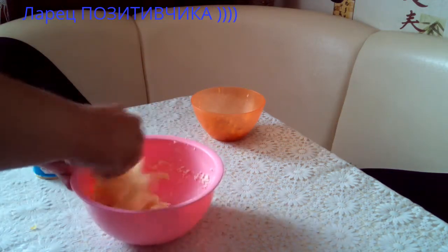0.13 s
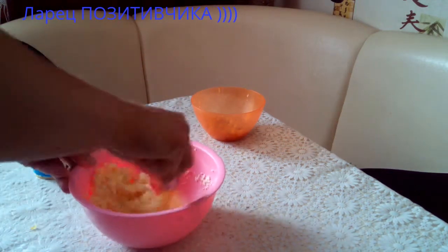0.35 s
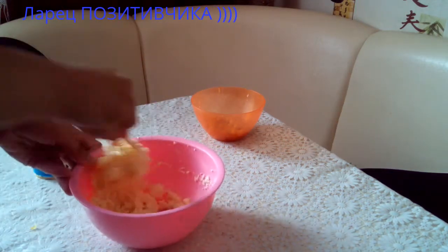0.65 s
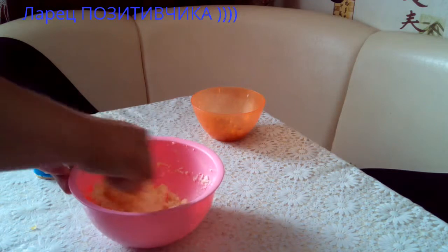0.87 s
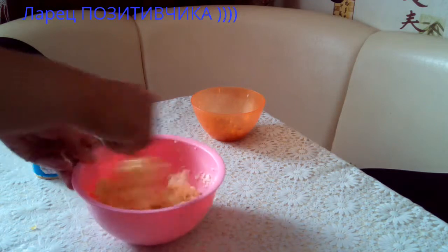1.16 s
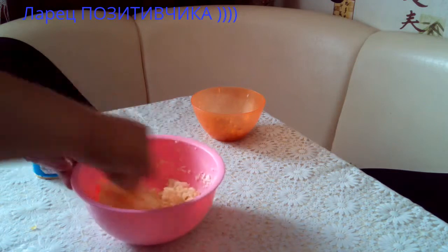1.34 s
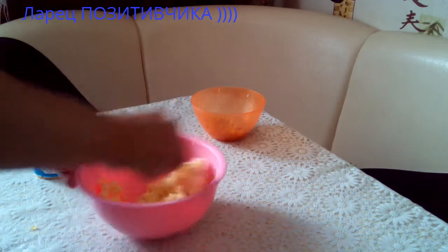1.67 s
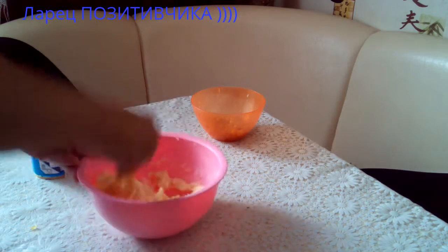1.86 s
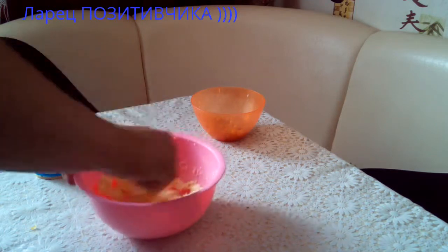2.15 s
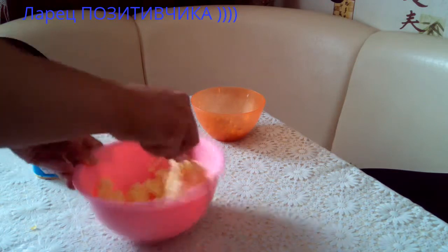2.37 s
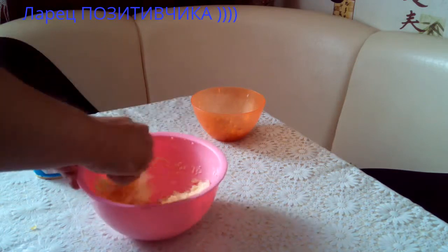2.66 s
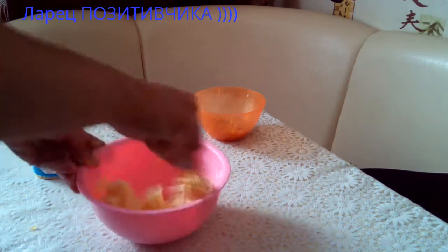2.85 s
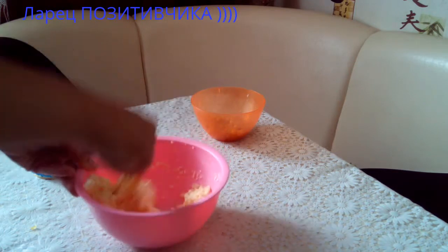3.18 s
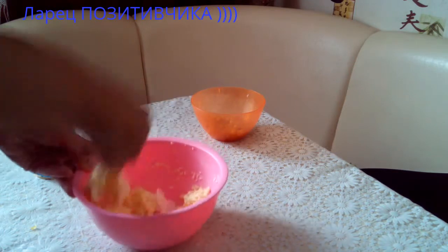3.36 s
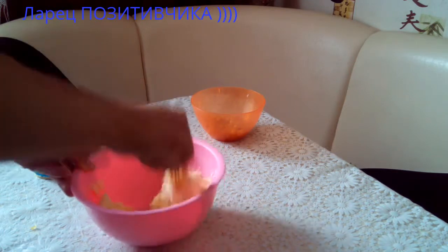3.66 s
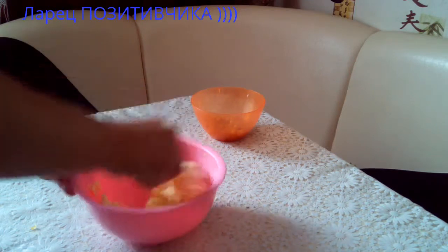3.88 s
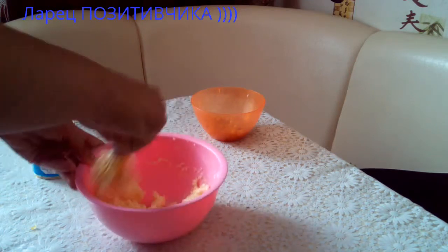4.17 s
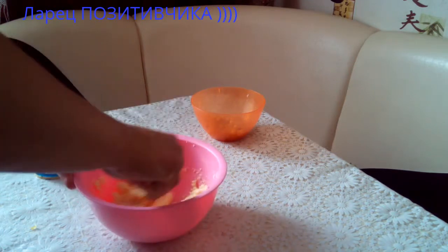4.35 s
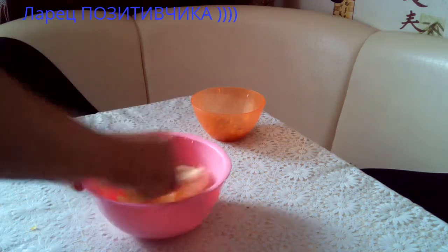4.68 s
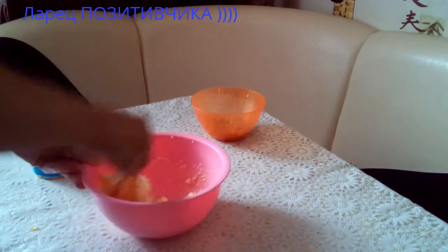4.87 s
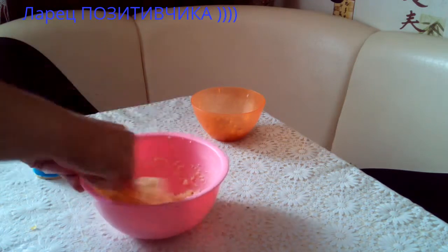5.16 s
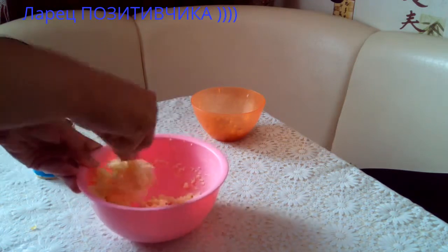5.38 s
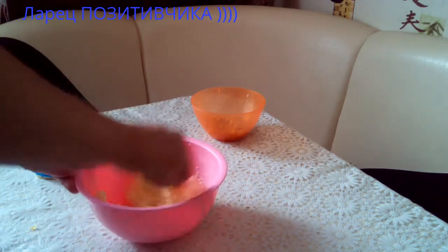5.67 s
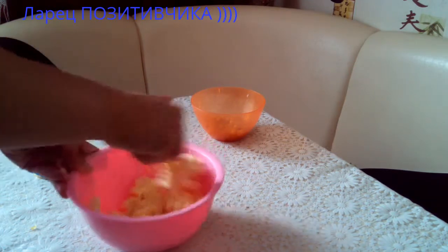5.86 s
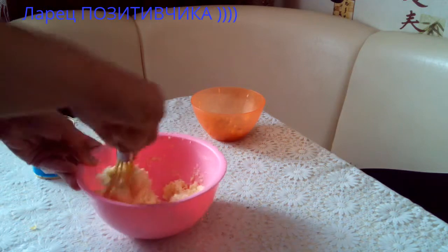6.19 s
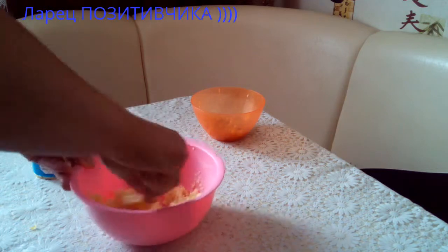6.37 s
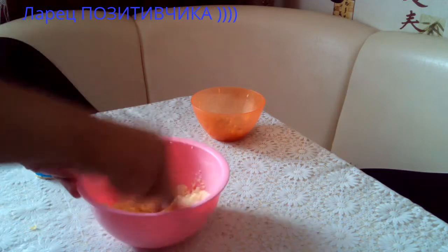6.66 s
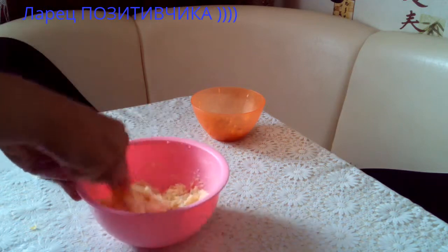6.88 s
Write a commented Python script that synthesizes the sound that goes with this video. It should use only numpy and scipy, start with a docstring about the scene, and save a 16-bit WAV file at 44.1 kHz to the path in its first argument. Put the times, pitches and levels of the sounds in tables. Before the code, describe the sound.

A spoon crunches and hisses through a stiff sugary mixture in a plastic bowl, with hollow knocks and low juddering rubs in a small room.

```python
"""A spoon hisses through a stiff, sugary mixture in a plastic bowl: crystals are crushed in uneven strokes.
The spoon knocks on the wall of the bowl, which swings, clicks, rings and thuds into the table;
the pushed bowl shifts on the tablecloth with low, juddering stick-slip rubs.
A small room answers with close echoes, over a quiet steady hiss of filtered noise."""
import sys
import numpy as np
from scipy import signal
from scipy.fft import rfft, irfft, next_fast_len
from scipy.io import wavfile
from scipy.ndimage import map_coordinates

SR = 44100
rng = np.random.default_rng(int(sys.argv[2]) if len(sys.argv) > 2 else 0)


def output_pcm(signal):
    """Save a mono or channel-first signal as 16-bit PCM at the path in sys.argv[1].

    Samples are clipped to [-1, 1] before scaling.
    """
    pcm = np.clip(np.atleast_2d(signal).T, -1, 1) * 32767
    wavfile.write(sys.argv[1], SR, np.round(pcm).astype(np.int16))


N = 310023
TIME = np.arange(N) / SR


def stirring(shape=1.4, dulling_db=1.5, idle_db=-84):
    """Each stroke swells and fades, starting bright and ending dull; returns level and brightness in dB."""
    # spoon strokes through the mixture, the short bright ones being crunches; levels before the sugar's trim:
    # (hardest_push_s, level_db, rise_s, fall_s, extra_brightness_db before each band takes its share)
    strokes = [(.155, -50.5, 0.12, 0.094, 0), (.345, -66.5, .015, .035, 11), (.55, -65.5, .07, .07, -7),
               (.725, -58, .06, 0.028, -3), (1.12, -62.5, .12, 0.097, -4), (1.559, -54.5, .015, .03, 12),
               (1.625, -56.5, .08, .06, 0), (1.989, -50, 0.078, 0.08, 1), (2.3, -70, .01, .03, 18),
               (2.421, -55.5, 0.12, 0.057, -1), (2.807, -52, 0.073, 0.12, 3.5), (3.16, -60.5, .04, .06, -8),
               (3.3, -53.5, .05, 0.045, -3), (3.41, -67.5, 0.02, 0.025, 13), (3.745, -56, 0.11, .08, -3.5),
               (4.145, -54.5, 0.069, .08, 1.5), (4.249, -58, .02, 0.032, 10),
               (4.66, -59.5, 0.099, .05, 4.5), (5.025, -60, .11, .09, 5), (5.385, -60, .09, .08, 0.5),
               (5.865, -56, .105, .045, 1.5), (6.205, -58.5, .09, .08, 0.5), (6.349, -65, .012, .025, 6),
               (6.47, -64, .03, .11, -1), (6.69, -57.5, 0.055, 0.049, 2), (6.93, -64.5, 0.051, 0.11, -3)]
    # the spoon never quite stops between strokes
    power = from_db(idle_db) ** 2
    weighted_brightness = 0
    for s, db, rise_s, fall_s, bright_db in strokes:
        progress = (TIME - s) / np.where(TIME < s, rise_s, fall_s)
        # shape 1 is a pointed swell, 2 a round one
        swell = np.exp(-np.minimum(np.abs(progress), 10) ** shape)
        push = (from_db(db) * swell) ** 2
        power = power + push
        # brightness is lost with each rise or fall time, as a lump gathers before the spoon
        weighted_brightness = weighted_brightness + push * (bright_db - dulling_db * progress)
    return 10 * np.log10(power), weighted_brightness / power


def sugar(per_s=3000, spread_db=2.0, level_db=-2.5, clump_db=1.0, clumps_per_s=70,
          patchy_db=3.0, patches_per_s=22, thinning=-.2):
    """Crystals are crushed and dragged along the wall in clumps: faster strokes break more of them."""
    # crushed sugar before the bowl colours it: (pitch_hz, relative_level_db per Hz)
    sugar_spectrum = [(300, -16.5), (900, -6.5), (1750, -4), (2200, 2), (2700, 1.5), (3050, -1),
                      (4000, -1.5), (6100, -0.5), (7000, -4), (7900, -15), (9200, -10.5), (11500, -20),
                      (12500, -30.5), (16000, -33.5)]
    stroke_db, bright_db = stirring()
    force = from_db(stroke_db + clump_db * wander(clumps_per_s, N))
    rate = per_s * np.sqrt(force / force.max())
    # dividing by the root of the rate leaves the loudness to the force
    crushed = coloured(grains(rate, spread_db, N) / np.sqrt(rate), sugar_spectrum)
    size = next_fast_len(N)
    hiss = rfft(in_bowl(crushed), size)
    freqs, out = np.fft.rfftfreq(size, 1 / SR), 0
    # a thin smear sounds brighter and less hollow than a thick lump; every clump has its own colour
    edges_hz = [0, 1800, 3000, 4200, 5600, 7600, SR]
    brightness_shares = [0, thinning, -.1, 0, .2, .9]
    for low, high, share in zip(edges_hz, edges_hz[1:], brightness_shares):
        band = irfft(hiss * ((freqs >= low) & (freqs < high)), size)[:N]
        out = out + band * from_db(share * bright_db + patchy_db * wander(patches_per_s, N))
    return from_db(level_db) * force * out


def grains(per_s, spread_db, size):
    """Crystals break as random clicks of either sign and uneven size."""
    born = rng.random(size) < per_s / SR
    signs = rng.choice([-1, 1], size)
    return born * signs * from_db(spread_db * np.minimum(rng.exponential(1, size), 4))


def in_bowl(x, travel=0.048, moves_per_s=3, strength=0.25):
    """Sounds made inside the bowl bounce between its walls; the paths change as the spoon travels."""
    # reflections between the walls, before travel and strength scale them: (delay_s, gain)
    reflections = [(.00052, 0.3), (.00113, -0.64), (.00187, 0.48), (.0029, 1), (.0043, -0.56),
                   (.0061, 0.39)]
    t = TIME[:len(x)]
    path = 1 + travel * wander(moves_per_s, len(x))
    bounces = sum(gain * map_coordinates(x, [(t - delay * path) * SR], order=3) for delay, gain in reflections)
    return rms_one(x + strength * bounces)


def knocks(damping=0.84, click_s=0.0032, softness=2.016, rise_s=0.00037):
    """The soft plastic wall swings out and back just once, bare spoon contact clicks, the table is struck."""
    # knocks of spoon and bowl, clicks before the mix trim:
    # (start_s, swing_peak_db, pitch_hz, click_db relative to the knock)
    knock_list = [(1.3376, -13.5, 603, -23.5), (1.4197, -33, 700, -8.5), (1.7946, -29, 920, 6.5),
                  (1.7979, -10, 650, -15), (1.8035, -23.5, 311, -45), (2.1798, -33.5, 630, -12.5),
                  (2.2602, -27.5, 547, -27), (2.266, -36, 650, -9.5), (2.5919, -16.5, 710, -9),
                  (2.6014, -8.5, 599, -28), (2.992, -43, 700, -10), (2.9978, -26, 824, -9),
                  (3.0035, -29, 384, -34), (3.9017, -25.5, 680, -29), (3.9104, -21, 652, -18),
                  (3.9187, -34.5, 356, -29), (3.9302, -29, 600, -37), (4.3138, -4, 614, -14),
                  (4.5236, -31.5, 555, -17.5), (4.763, -42, 560, -22.5), (4.871, -44, 600, -12),
                  (5.211, -35.5, 603, -7), (5.2208, -18, 630, -14.5), (6.3372, -37.5, 440, -33),
                  (6.451, -38, 520, -14), (6.787, -38.5, 476, -35), (6.9354, -38.5, 940, -39)]
    # the spoon's hard click: (pitch_hz, relative_level_db per Hz)
    click_spectrum = [(500, -18.5), (1400, 5), (2000, 7), (2700, 2), (3700, -5), (4800, -10.5), (6000, -9),
                      (8000, -20), (11000, -17.5), (13000, -29), (16000, -49)]
    (swings, clicks, force), t = np.zeros((3, N)), TIME[:SR // 20]
    for s, db, hz, click_db in knock_list:
        swing = resonate(resonate(t == 0, hz, damping * hz), hz, damping * hz)
        # the mixture cushions the blow
        cushion = signal.butter(4, softness * hz, fs=SR, output="sos")
        swing = signal.sosfilt(cushion, swing)
        click_envelope = (np.exp(-t / click_s) - np.exp(-t / rise_s)) / 2
        click = coloured(rng.standard_normal(len(t)), click_spectrum) * click_envelope
        add(swings, s, from_db(db) * swing / np.abs(swing).max())
        add(clicks, s, from_db(db + click_db) * click)
        add(force, s, from_db(thud_db_of(db, hz)) * (t == 0))
    return swings, clicks, force


def thud_db_of(db, hz):
    """Harder and deeper knocks drive the table more: -36.5 dB of force for a -18 dB knock at 600 Hz."""
    follows, db_per_octave = .55, -11.5
    return -36.5 + follows * (db + 18) + db_per_octave * np.log2(hz / 600)


def boom(swing):
    """The loaded base of the bowl answers each knock with a short, hollow boom."""
    return from_db(10.5) * resonate(swing, hz=334.0, width_hz=25)


def ring(drive, modes):
    """Every contact sets the same modes ringing, neighbours in opposite directions."""
    t, response = TIME[:SR], 0
    for k, (hz, db, t60) in enumerate(modes):
        response = response + (-1) ** k * from_db(db - 60 * t / t60) * np.sin(2 * np.pi * hz * t)
    return signal.fftconvolve(drive, response)[:N]


def bowl_ring(swing, rub):
    """Knocks, and more weakly rubs, excite the lasting resonances of the bowl."""
    # bowl resonances, levels relative to one another: (pitch_hz, level_db, t60_s)
    bowl_modes = [(338, -7, 0.13), (336, -24.5, 0.45), (439, -14.5, 0.21), (473, -30, 0.46),
                  (595, -44, 0.28), (662, -34.5, 0.37), (798, -20, 0.32), (820, -34, 0.53),
                  (1037, -21, 0.11), (1060, -26.5, 0.094), (1370, -26.5, 0.33), (1812, -26, 0.33)]
    return from_db(-29.0) * ring(swing + from_db(-12.5) * rub, bowl_modes)


def rubs(jitter=0.23, damping=0.39, grit_hz=680, grit_width_hz=520, level_db=-4.5, drag_db=-35, glide=0.11):
    """The base sticks and slips unevenly, swelling with the push; returns sound and force on the table."""
    # the bowl shifting on the cloth, levels before level_db or drag_db, length from middle to 1/e^2,
    # pitch before jitter and glide: (middle_s, level_db, length_s, pitch_hz)
    rub_list = [(.11, -62.5, .08, 330), (1.434, -38.5, 0.021, 371.4), (2.086, -43.5, 0.027, 317.4),
                (2.18, -38.5, 0.036, 322.2), (2.275, -36, .028, 306), (2.33, -49, 0.057, 220.7),
                (2.944, -51.5, .068, 309.6), (3.176, -53.5, 0.076, 354), (3.335, -54, 0.044, 351),
                (3.662, -61.5, 0.052, 147), (4.081, -47.5, 0.048, 330), (4.254, -49, 0.055, 353.7),
                (4.781, -45, 0.022, 385), (4.891, -51, 0.073, 368.3), (5.697, -50, 0.028, 359.4),
                (5.76, -61, .062, 645), (6.029, -55, 0.038, 330), (6.168, -53.5, 0.0693, 400),
                (6.353, -46, 0.03, 411.6), (6.409, -50, 0.073, 450), (6.457, -47, 0.03, 380.7),
                (6.504, -53, 0.0436, 397), (6.792, -48.5, 0.0234, 322.5), (6.876, -57, 0.082, 250),
                (6.96, -57, .04, 1168)]
    out, force, t = np.zeros(N), np.zeros(N), TIME[:SR // 4]
    middle = t[-1] / 2
    for s, db, length, hz in rub_list:
        slip_times = np.cumsum(np.exp(jitter * rng.standard_normal(size=400)) / hz)
        slip_sizes = rng.uniform(0.093, 1, size=400)
        slips = np.bincount((slip_times * SR).astype(int), slip_sizes, len(t))[:len(t)]
        judder = rms_one(resonate(resonate(slips, hz, damping * hz), hz, 2 * hz))
        push = np.exp(-((t - middle) / length) ** 2 * 2)
        # the judder is quickest at the height of the push
        judder = np.interp(np.cumsum(1 + glide * (push - 1)) / SR, t, judder)
        friction = rng.standard_normal(len(t))
        grit = rms_one(resonate(resonate(friction, grit_hz, grit_width_hz), grit_hz, grit_width_hz))
        rub = judder + from_db(grit_db_of(db, hz)) * grit
        add(out, s - middle, from_db(db + level_db) * push * rub)
        add(force, s - middle, from_db(db + drag_db) * push * friction)
    return out, force


def grit_db_of(db, hz):
    """Light, quick rubs are grittier: -5.5 dB against the judder for a table level of -47 dB at 355 Hz."""
    follows, db_per_octave = -.3, 5
    return -5.5 + follows * (db + 47) + db_per_octave * np.log2(hz / 355)


def table_top(force):
    """Blows and dragging set the table top ringing in its low resonances."""
    # resonances of the table top: (pitch_hz, level_db, t60_s)
    table_modes = [(50.3, -11.5, 0.16), (87, -16, 0.18), (103, -10.5, 0.19), (130.4, -4, 0.26),
                   (156, -8, 0.1), (265, -4, 0.22)]
    return ring(force, table_modes)


def room(x, wet_db=3.0, gap_s=0.0055, early_db=4, early_s=.02):
    """Close walls give dense early echoes, then a tail that dies sooner in the treble."""
    # colour of the echo before wet_db and the early boost: (pitch_hz, level_db per Hz)
    echo_spectrum = [(60, -17), (150, 5.5), (300, 2.5), (520, -6), (780, -0.5), (1100, -4.5), (1450, -1),
                     (2200, 2.5), (5000, 5), (15000, -6)]
    # decay of the room's tail: (pitch_hz, t60_s)
    room_t60 = [(100, 0.87), (400, 0.28), (900, 0.41), (2500, 0.39), (6000, 0.32), (14000, 0.11)]
    t = TIME[:SR * 3 // 4]
    freqs, edges_hz = np.fft.rfftfreq(len(t), 1 / SR), np.geomspace(40, 16000, num=19)
    white, response = rfft(rng.standard_normal(len(t))), 0
    early_boost = 1 + (from_db(early_db) - 1) * np.exp(-t / early_s)
    onset = np.clip((t - gap_s) / 0.0025, 0, 1) * early_boost
    for low, high in zip(edges_hz, edges_hz[1:]):
        hz = np.sqrt(low * high)
        band = irfft(white * ((freqs >= low) & (freqs < high)), len(t))
        band = band * onset * from_db(-60 * t / at_hz(room_t60, hz))
        # a wider band carries more energy
        width_gain = np.sqrt(2 * (high - low) / SR / len(t))
        response = response + rms_one(band) * width_gain * from_db(at_hz(echo_spectrum, hz))
    return from_db(wet_db) * signal.fftconvolve(x, response)[:N]


def background(level_db=-65.5):
    """A quiet steady hiss: noise filtered to a fixed spectrum."""
    # background hiss: (pitch_hz, relative_level_db per Hz)
    air_spectrum = [(20, -11.5), (50, -17), (100, -6.5), (170, -4.5), (300, -6.5), (700, -8.5), (1500, -15),
                    (3000, -18.5), (6000, -18), (8000, -28), (12000, -32), (16000, -34.5)]
    return from_db(level_db) * coloured(rng.standard_normal(N), air_spectrum)


def from_db(db):
    """Decibels to gain."""
    return 10 ** (np.asarray(db) / 20)


def rms_one(x):
    """Scale to unit rms."""
    return x / np.sqrt(np.mean(x ** 2) + 1e-20)


def at_hz(points, hz):
    """Read a table on a log-frequency axis."""
    freqs, values = np.transpose(points)
    return np.interp(np.log(np.maximum(hz, 1)), np.log(freqs), values)


def coloured(x, spectrum):
    """Give a noise a spectrum; rms 1."""
    gain = from_db(at_hz(spectrum, np.fft.rfftfreq(len(x), 1 / SR)))
    return rms_one(irfft(rfft(x) * gain, len(x)))


def resonate(x, hz, width_hz):
    """One two-pole resonance with gain of about 1 on top."""
    r = np.exp(-np.pi * width_hz / SR)
    feed = np.array([1, 0, -1]) * (1 - r * r) / 2
    feedback = [1, -2 * r * np.cos(2 * np.pi * hz / SR), r * r]
    return signal.lfilter(feed, feedback, x + 1e-18)


def wander(per_s, size):
    """A slow random curve with a spread of about 1: straight lines between random points."""
    return np.interp(TIME[:size] * per_s, np.arange(4000), rng.standard_normal(size=4000))


def add(track, s, sound):
    """Mix a sound into the track at a time; one due before zero starts at zero."""
    start = max(round(s * SR), 0)
    track[start:start + len(sound)] += sound[:max(N - start, 0)]


def scene():
    """Mixture, bowl and table sound in the room over a quiet steady hiss."""
    hiss = sugar()
    swing, click, blow = knocks()
    rub, drag = rubs()
    bowl = boom(swing) + bowl_ring(swing, rub)
    table = table_top(blow + drag)
    echoes = room(swing + click + from_db(-10.5) * rub + from_db(-11) * hiss)
    # the clicks sound directly, a little stronger than what the room receives, and again by way of the room
    direct = swing + from_db(1) * click + rub + hiss
    return (direct + bowl + table + echoes + background())[None]


def record(dry):
    """The top is cut steeply above 15650 Hz."""
    low_pass = signal.ellip(10, .1, 80, 15650, fs=SR, output="sos")
    return signal.sosfilt(low_pass, dry)


dry = scene()
out = record(dry)
output_pcm(out)
```